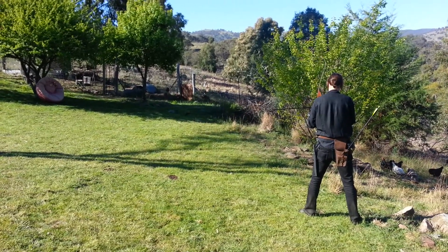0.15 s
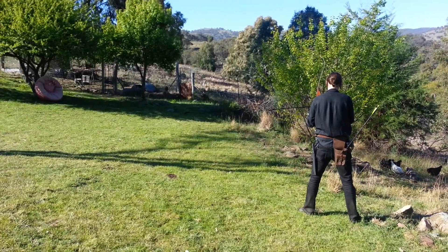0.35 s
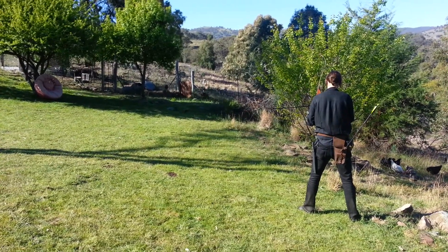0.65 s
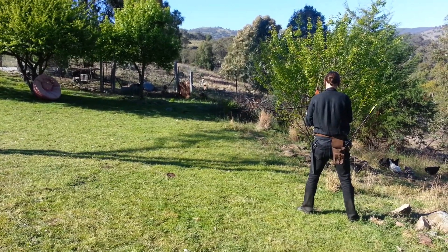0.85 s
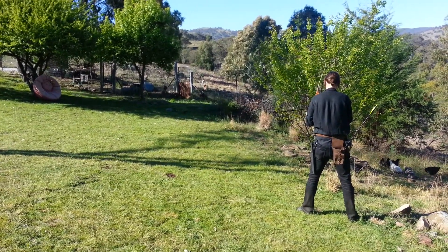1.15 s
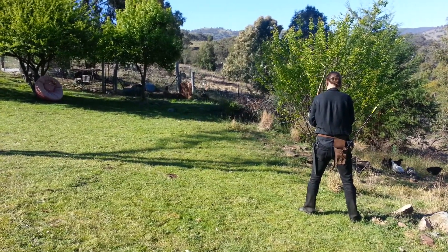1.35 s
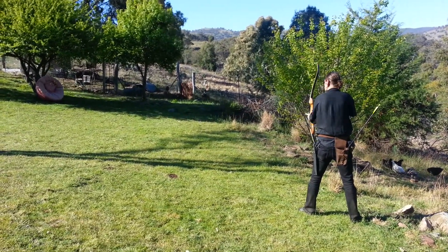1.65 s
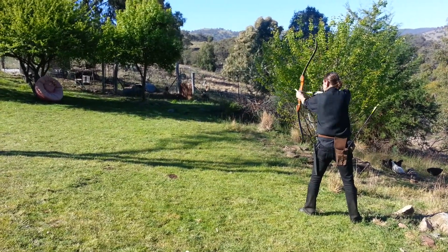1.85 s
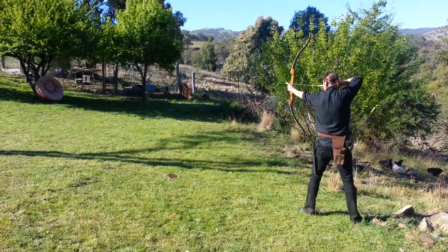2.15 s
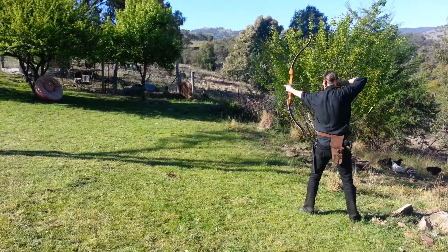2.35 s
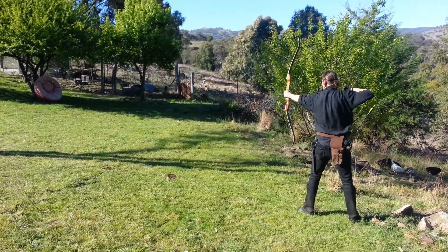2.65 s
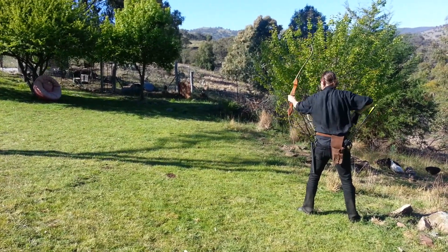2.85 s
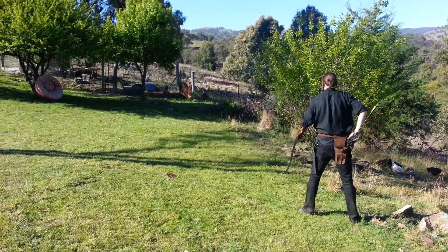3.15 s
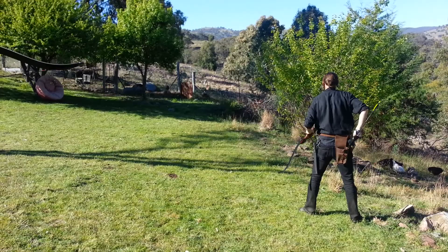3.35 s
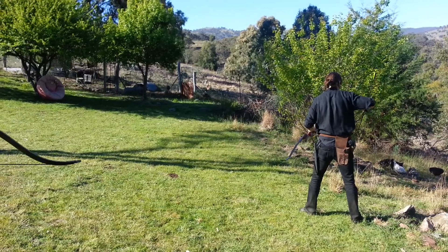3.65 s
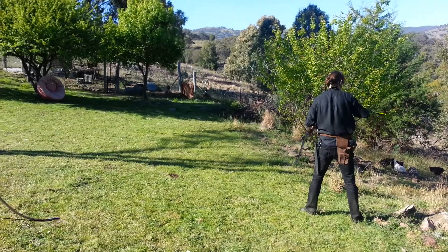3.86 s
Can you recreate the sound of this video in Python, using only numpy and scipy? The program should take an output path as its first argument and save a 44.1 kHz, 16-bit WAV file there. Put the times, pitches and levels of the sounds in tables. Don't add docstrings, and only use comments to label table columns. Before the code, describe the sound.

A bow shot on an open lawn. For 2.5 seconds it is very quiet: faint fluttering hiss, a distant fly until 1.6, a weak hen cluck at 1.3, small gear ticks at 1.0 and 2.1. At 2.55-2.65 the string snaps and the shaft scrapes and rings briefly; at 2.87 a dry crack and deep short thud in straw. Low wind thumps buffet the microphone from 2.55 to 4.

```python
import sys
import numpy as np
from scipy import signal
from scipy.fft import rfft, irfft, next_fast_len
from scipy.io import wavfile
from scipy.ndimage import uniform_filter1d, map_coordinates

SR = 44100
rng = np.random.default_rng(int(sys.argv[2]) if len(sys.argv) > 2 else 0)


def to_wav(s):
    ch = np.atleast_2d(s).T
    pcm = np.round(np.clip(ch, -1, 1) * 32767)
    wavfile.write(sys.argv[1], SR, pcm.astype(np.int16))


def level_to_linear(level):
    exponent = np.asarray(level, float) / 20
    return 10 ** exponent


N = 176400


def unit(x):
    return x / np.sqrt(np.mean(x ** 2) + 1e-20)


def along(points, hz):
    point_hz, value = np.transpose(points)
    return np.interp(np.log(hz + 1), np.log(point_hz + 1), value)


def curves(rows):
    s, *columns = np.transpose(rows)
    return np.array([np.interp(np.arange(N) / SR, s, column) for column in columns])


def wobble(rate):
    knots = rng.standard_normal(int(N * rate / SR) + 4)
    return map_coordinates(knots, [np.arange(N) * rate / SR])


def filtered(x, response):
    m = next_fast_len(x.shape[-1] + 4096)
    spectrum = rfft(x, m) * response(np.fft.rfftfreq(m, 1 / SR))
    return irfft(spectrum, m)[..., :x.shape[-1]]


def hump(centre_hz, rise, fall):
    return lambda f: (f / centre_hz) ** rise / (1 + (f / centre_hz) ** 2) ** ((rise + fall) / 2)


def add(track, s, piece):
    i = round(s * SR)
    room = track[max(i, 0):]
    room[:len(piece) + min(i, 0)] += piece[max(-i, 0):][:len(room)]


def bursts(rows, sharp, rise_s):
    out, t = np.zeros(N), np.arange(SR // 5) / SR
    for s, db, hz, t60 in rows:
        noise = filtered(rng.standard_normal(len(t)), hump(hz, sharp, sharp))
        grain = level_to_linear(2 * wobble(692)[:len(t)])
        envelope = level_to_linear(db - 6 - 60 * t / t60) * (1 - np.exp(-t / rise_s))
        add(out, s, envelope * unit(grain * noise))
    return out


def rings(rows, rough):
    out, t = np.zeros(N), np.arange(SR // 2) / SR
    for s, rise, db, hz, t60 in rows:
        size = 1 + rough * wobble(394)[:len(t)]
        envelope = level_to_linear(db - 60 * t / t60) * (1 - np.exp(-(t / rise) ** 2))
        add(out, s, envelope * size * np.sin(2 * np.pi * hz * t))
    return out


def ports(x, pan_db, tilt, ring_hz, lag_s=0.0002256, lead_rad=0):
    # hz, left_minus_right_db
    port_tilt = [(60, -7.5), (300, 0.5), (1300, 11.5), (2400, 16), (4400, 2.5), (8000, -13), (15000, 4.5)]
    side = np.array([[.5], [-.5]])

    def response(f):
        level = level_to_linear(side * (pan_db + tilt * along(port_tilt, f)))
        turn = lead_rad * np.tanh(f / 905) - 2 * np.pi * f * lag_s
        cavity = (1 - (f / ring_hz) ** 2 + .55j * f / ring_hz) ** 1.19
        return level * np.exp(1j * side * turn) / cavity

    return filtered(np.array([x, x]), response)


def hen():
    # start_s, rise_s, peak_db, pitch_hz, t60_s
    clucks = [
        (-.02, .01, -53, 335, 0.34),
        (1.27, 0.01195, -52, 241, 0.12),
    ]
    return rings(clucks, rough=.2)


def fly():
    # time_s, wing_hz, level_db
    flight = [
        (0, 563.6, -67.5),
        (.5, 556, -60),
        (1.2, 508, -62.5),
        (1.6, 473, -78),
    ]
    wing_hz, fly_db = curves(flight)
    turns = 2 * np.pi * np.cumsum(wing_hz * (1 + 0.0031 * wobble(20.6))) / SR
    beat = .9 * np.sin(turns) + np.sin(2 * turns)
    present = np.arange(N) / SR < flight[-1][0]
    return level_to_linear(fly_db + 45 + 3.5 * wobble(12)) * beat * present


def hiss():
    # pitch_hz, density_db (per Hz)
    colour = [(30, 9), (80, -1), (200, 2), (400, -2), (750, -4.5), (1500, -6.5), (6700, -3), (9000, -13),
              (15000, -19)]
    # pitch_hz, likeness of the ports (0 to 1)
    likeness = [(300, 0.79), (1400, 0.033), (15000, 0.022)]

    def split(f):
        turn = np.arccos(np.clip(along(likeness, f), 0, 1)) / 2
        return level_to_linear(along(colour, f)) * [np.cos(turn), np.sin(turn)]

    common, opposed = filtered(rng.standard_normal((2, N)), split)
    return unit(ports(common, 0, 0.56, SR) + ports(opposed, 0, 0.61, SR) * [[1], [-1]])


def gate():
    # time_s, hiss_db
    rest = [(0, -52), (.2, -64), (1.0, -62.5), (1.3, -62), (2.05, -61), (2.5, -57), (2.6, -44),
            (3.0, -52.5), (4, -54)]
    # centre_s, length_s, hiss_db
    openings = [(0.071, 0.044, -49), (0.129, 0.12, -53.5), (0.385, 0.2, -52.5), (0.712, 0.05, -58),
                (0.883, 0.13, -58), (1.033, 0.047, -51), (1.097, 0.13, -54), (1.192, 0.077, -58.5),
                (1.452, 0.053, -59.5), (1.563, 0.086, -60), (1.722, 0.081, -59), (1.961, 0.088, -54),
                (2.082, 0.044, -50), (2.481, 0.023, -51), (3.13, 0.15, -54.5), (3.364, 0.48, -55),
                (3.65, 0.077, -55), (3.817, 0.062, -50)]
    t = np.arange(N) / SR
    power = level_to_linear(2 * curves(rest)[0])
    for s, length, db in openings:
        power = power + level_to_linear(2 * db) * np.exp(-((t - s) / (0.29 * length)) ** 2)
    return np.sqrt(power) * level_to_linear(.3 + .9 * wobble(40))


def gear():
    # start_s, peak_db, pitch_hz, t60_s
    ticks = [
        (.058, -44.5, 3600, .07),
        (1.0266, -37, 4040, 0.014),
        (1.171, -50, 4500, 0.045),
        (2.066, -46, 2986, 0.046),
        (2.079, -34.5, 2855, 0.0077),
        (2.473, -51, 2976, 0.024),
        (2.8235, -35.5, 6100, 0.026),
    ]
    return bursts(ticks, sharp=2.3, rise_s=.0002)


def eddies(rows, kicks, rise, fall):
    out, t = np.zeros(N), np.arange(-SR // 8, SR // 8) / SR
    for s, length, db, hz in rows:
        bell = np.exp(-(t / (0.55 * length)) ** 2)
        swing = bell * filtered(rng.standard_normal(len(t)), hump(1.24 * hz, rise, fall))
        add(out, s + t[0], level_to_linear(db + 1.68) * swing * np.sqrt(np.sum(bell ** 2) / np.sum(swing ** 2)))
    for s, db, hz, rise_ms, way in kicks:
        push = (1 + np.tanh(700 * t / rise_ms)) / 2
        decay = np.exp(-1.77 * hz * np.hypot(t, rise_ms / 1000))
        add(out, s + t[0], np.sign(way) * level_to_linear(db + 3) * push * decay * np.cos(2 * np.pi * hz * t))
    return out


def wind():
    # centre_s, length_s, level_db, pitch_hz
    eddies_left = [(1.556, 0.048, -56.5, 404), (1.718, 0.051, -52.5, 376), (1.914, 0.019, -40.5, 136),
                   (2.338, 0.062, -46, 163.5), (2.492, 0.022, -30.5, 117.2), (2.627, 0.033, -26.5, 221.1),
                   (2.715, 0.04, -17.5, 210), (2.767, 0.018, -19.5, 229), (2.788, 0.014, -17, 204),
                   (2.814, 0.009, -18.5, 166), (2.986, 0.021, -23.5, 182), (3.026, 0.046, -22, 133.3),
                   (3.06, 0.018, -23.5, 185), (3.118, 0.042, -21.5, 213), (3.192, 0.062, -26, 191),
                   (3.321, 0.016, -19, 188), (3.36, 0.02, -20, 213), (3.418, 0.0656, -28, 185),
                   (3.547, 0.019, -24, 168), (3.596, 0.022, -26.5, 153), (3.656, 0.041, -22.5, 167),
                   (3.744, 0.038, -25.5, 202), (3.808, 0.024, -18, 219), (3.918, 0.011, -28, 138.8),
                   (3.965, 0.027, -27, 100)]
    eddies_right = [(0.466, 0.012, -53, 97.3), (1.047, 0.027, -53, 118), (1.103, 0.028, -48, 97),
                    (1.544, 0.023155, -41, 127), (1.707, 0.039, -35, 98), (1.939, 0.039, -35.5, 104),
                    (2.14, 0.024, -40, 93.5), (2.171, 0.063, -38, 73), (2.31, 0.021, -32.5, 97),
                    (2.345, 0.04, -34.5, 111), (2.562, 0.01628, -30, 142), (2.655, 0.057, -26.5, 153),
                    (2.743, 0.026, -21.5, 106), (2.776, 0.035, -26, 104.7), (2.939, 0.035, -22.5, 129),
                    (3.136, 0.039, -33, 74), (3.198, 0.014, -24, 101.0), (3.325, 0.0083, -19, 104),
                    (3.44, 0.032, -21.5, 194), (3.507, 0.034, -20.5, 108), (3.543, 0.03, -18, 83),
                    (3.608, 0.045, -22.5, 119), (3.664, 0.031, -26, 104), (3.813, 0.075, -32.5, 74.6)]
    # start_s, peak_db, pitch_hz, rise_ms, direction (sign)
    kicks_left = [(2.6971, -15, 253, 0.39, 1), (2.7159, -6, 190, 0.27, -1), (2.7304, -20, 247, .5, -1),
                  (2.7575, -11, 298, .5, -1), (2.7718, -7.5, 347, 0.29, 1), (2.78, -2.5, 128, 0.93, 1),
                  (2.9807, -11, 248, .6, -1), (3.0246, -13.5, 131, 0.84, -1), (3.0711, -18.5, 300, 0.45, 1),
                  (3.0988, -5, 290, 0.74, -1), (3.1111, -12, 278, 0.59, -1), (3.181, -13.5, 251, 0.48, -1),
                  (3.3204, -7, 224, 0.31, 1), (3.353, -5, 254, 0.46, 1), (3.8109, -4, 218, 0.36, 1),
                  (3.8214, -2.5, 186, 0.16, 1)]
    kicks_right = [
        (2.559, -12.5, 150, 1, 1),
        (2.6548, -8, 138, 0.49, -1),
        (3.4373, -0.5, 195, .33, 1),
    ]
    # time_s, left_db, right_db
    breeze = [(0, -122, -114), (1.9, -75, -79), (2.15, -63, -52.5), (2.45, -47, -44.5), (2.62, -41, -26.5),
              (2.68, -36, -23.5), (2.95, -28, -30.5), (3.21, -24, -38), (3.25, -53, -24), (3.3, -22.5, -33),
              (3.7, -29.5, -37.5), (3.85, -34, -45), (4, -35, -38)]
    rise, fall = 2.6, 5.5
    lumps = level_to_linear(6.5 * np.clip([wobble(33), wobble(32.965)], -2, 1.5))
    buffet = unit(lumps * filtered(rng.standard_normal((2, N)), hump(146.0, rise, fall)))
    left = eddies(eddies_left, kicks_left, rise, fall)
    right = eddies(eddies_right, kicks_right, rise, fall)
    low = level_to_linear(curves(breeze)) * buffet + np.array([left, right])
    flutter = unit(filtered(rng.standard_normal((2, N)), hump(494, 1.4, 1.86)))
    strength = np.abs(uniform_filter1d(low ** 2, size=SR // 40))
    return low + level_to_linear(-46) * strength ** 0.13 * flutter


def bow_release():
    # start_s, peak_db, pitch_hz, t60_s
    scrapes = [(2.5486, -21.5, 2980, 0.011), (2.5486, -30, 11000, 0.0055), (2.5525, -33, 2390, 0.043),
               (2.5615, -50, 4000, 0.00992), (2.577, -27.5, 1000, 0.14), (2.579, -26, 3560, 0.033),
               (2.588, -17.5, 2200, 0.044), (2.595, -15.5, 6000, 0.02), (2.5952, -24, 12000, .01),
               (2.62, -49, 12500, 0.037), (2.602, -25.5, 2560, 0.085), (2.608, -27.5, 5740, 0.08),
               (2.619, -14.5, 2100, 0.054), (2.625, -27, 970, 0.38)]
    # start_s, rise_s, peak_db, pitch_hz, t60_s
    shaft = [(2.6165, .0045, -11, 2340, .05), (2.611, .0012, -12, 2680, .016), (2.62, .002, -24, 2490, .04),
             (2.5912, .0008, -13, 2600, .014), (2.5955, .001, -18, 2480, .02),
             (2.602, .002, -22, 2340, .03), (2.652, .006, -32, 905, .12), (2.5952, .0004, -25, 6200, .012),
             (2.615, .004, -28, 1820, .1)]
    return bursts(scrapes, sharp=3.2, rise_s=.001) + rings(shaft, rough=.3)


def target_hit():
    # start_s, peak_db, pitch_hz, t60_s
    cracks = [
        (2.8659, -15, 5200, 0.004),
        (2.8677, -7.5, 5200, 0.0033),
        (2.8676, -16, 11500, .008),
        (2.869, -22.5, 3960, 0.02),
        (2.8748, -28, 1700, .025),
        (2.8765, -32, 6000, 0.086),
        (2.92, -41.5, 5458, 0.13),
        (2.925, -41, 1630, 0.17),
    ]
    # start_s, rise_s, peak_db, pitch_hz, t60_s
    straw = [
        (2.867, .001, -6.5, 200, .05),
        (2.8658, .0003, -10.5, 1780, .008),
        (2.8663, .0004, -11, 780, .011),
        (2.8676, .0001, -15, 4750, .004),
        (2.8672, .0003, -15, 1300, .009),
        (2.8659, .0001, -17, 3200, .006),
        (2.8752, .0005, -21, 800, .015),
        (2.94, .003, -39, 800, .06),
    ]
    return bursts(cracks, sharp=2.1, rise_s=.0002) + rings(straw, rough=.05)


def yard(x):
    # pitch_hz, t60_s
    decay = [(1200, 0.74), (3000, 0.19), (10000, 0.22)]
    hz, t, z = signal.stft(rng.standard_normal((2, SR // 2)), SR, nperseg=256)
    tail = signal.istft(z * level_to_linear(-60 * t / along(decay, hz)[:, None]), SR, nperseg=256)[1]
    delayed = np.pad(x, (400, 0))[None]
    return signal.fftconvolve(delayed, tail / np.linalg.norm(tail[0]), axes=1)[:, :N]


def scene():
    small = hen() + gear()
    air = gate() * (hiss() + fly())
    release = bow_release()
    hit = target_hit()
    near = ports(release, pan_db=2.5, tilt=0.79, ring_hz=6500, lag_s=0, lead_rad=1.43)
    near = near + ports(hit + small, pan_db=.5, tilt=1.0, ring_hz=6440)
    echoes = level_to_linear(-14) * yard(release) + level_to_linear(-18) * yard(hit)
    return near + echoes + wind() + air


def roll_off(x):
    return signal.sosfilt(signal.butter(12, 14830, fs=SR, output="sos"), x)


def record(dry):
    mix = filtered(dry, lambda f: (f < 14830) * f ** 2 / (f ** 2 + 35 ** 2))
    return roll_off(mix)


dry = scene()
out = record(dry)
to_wav(out)
```